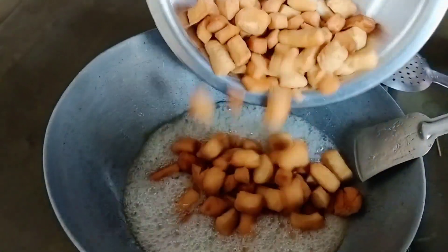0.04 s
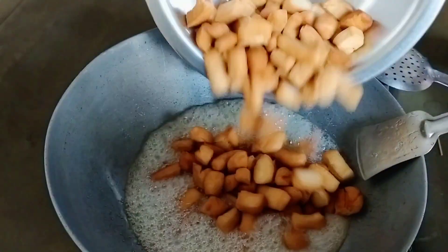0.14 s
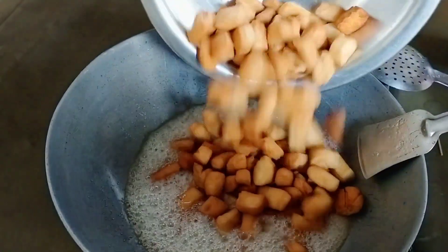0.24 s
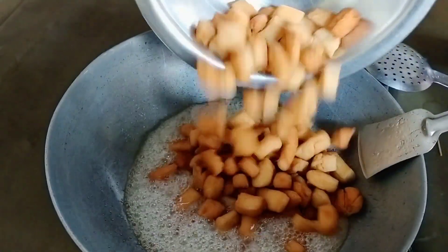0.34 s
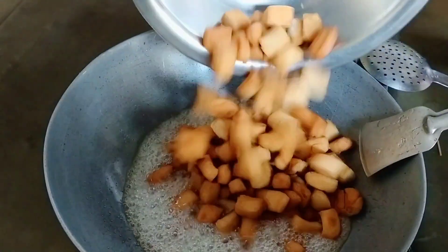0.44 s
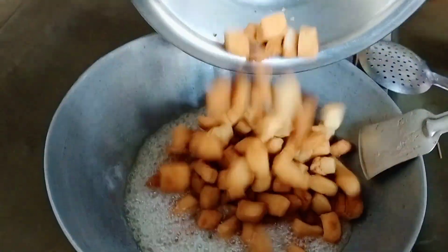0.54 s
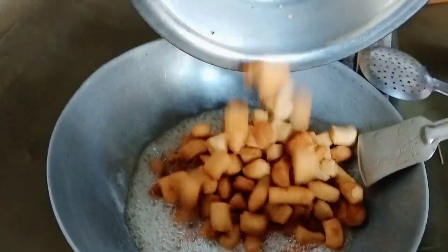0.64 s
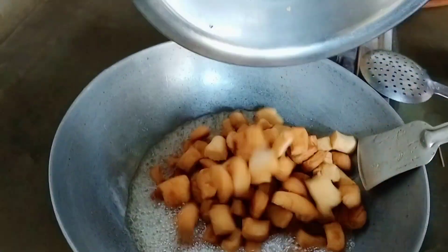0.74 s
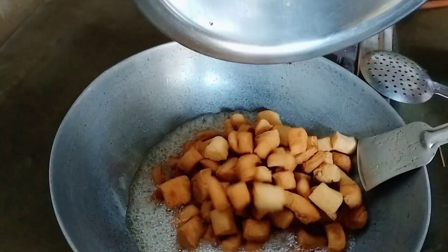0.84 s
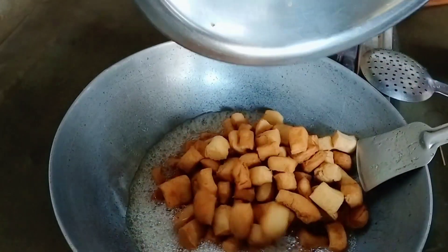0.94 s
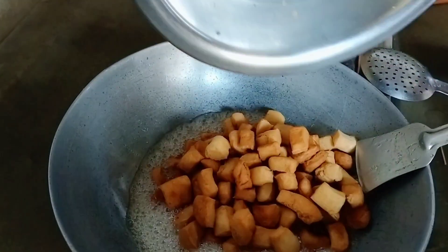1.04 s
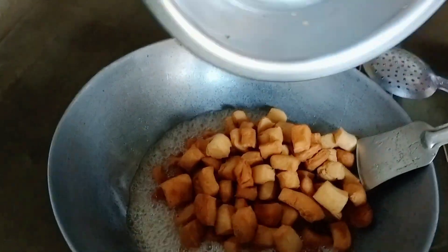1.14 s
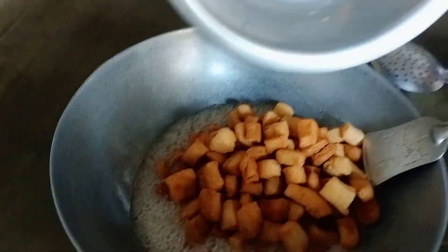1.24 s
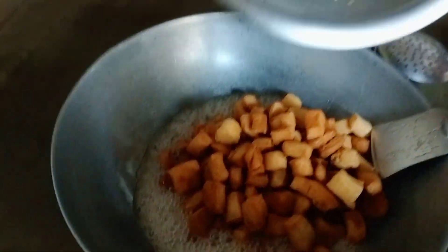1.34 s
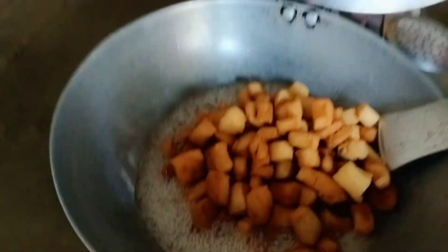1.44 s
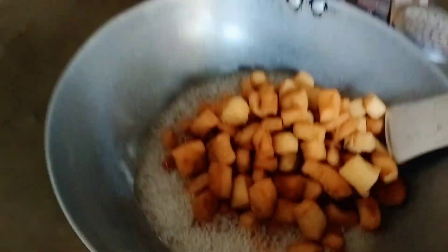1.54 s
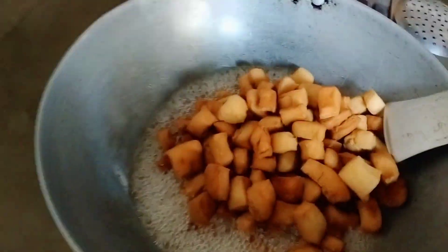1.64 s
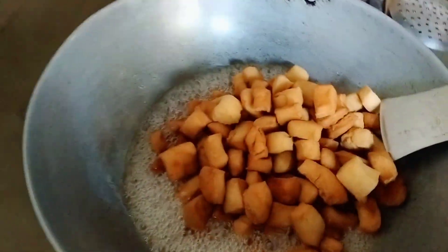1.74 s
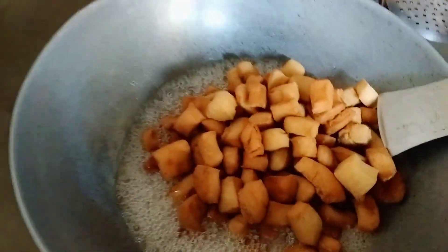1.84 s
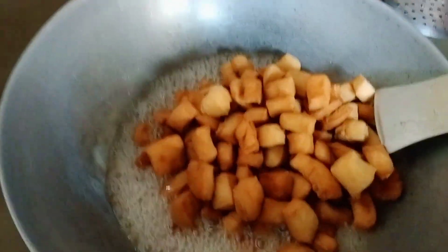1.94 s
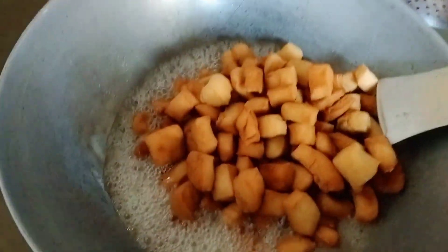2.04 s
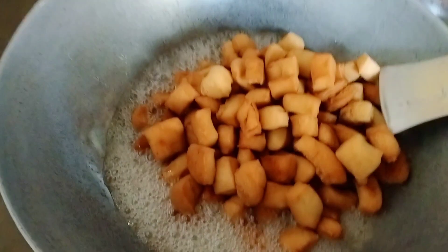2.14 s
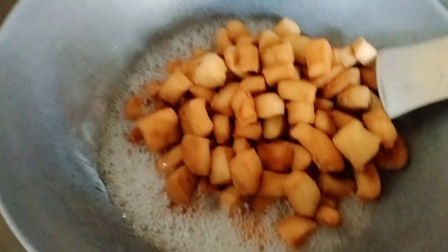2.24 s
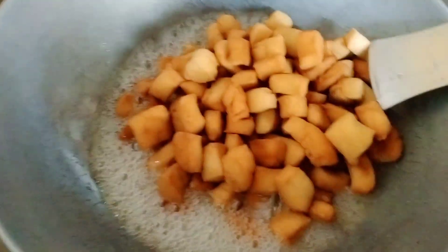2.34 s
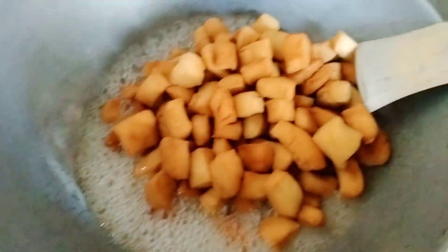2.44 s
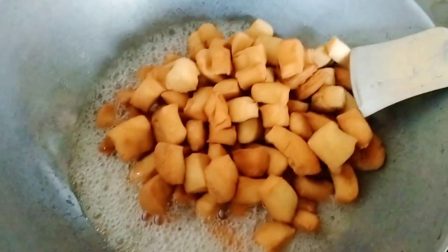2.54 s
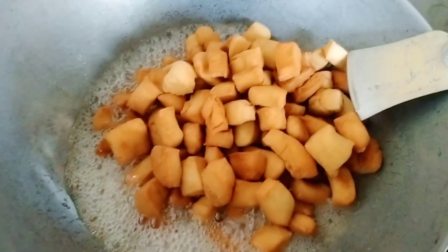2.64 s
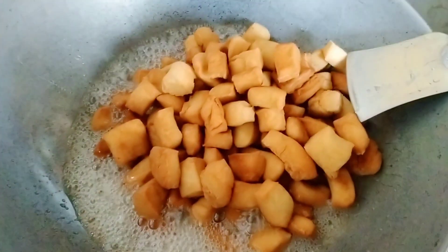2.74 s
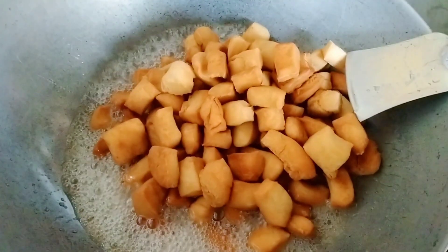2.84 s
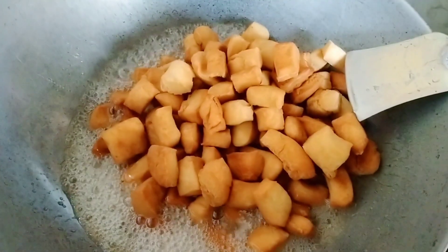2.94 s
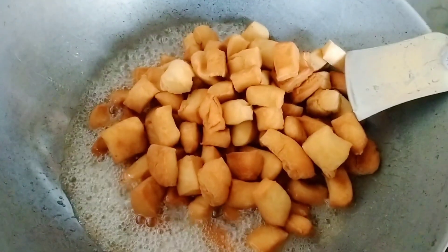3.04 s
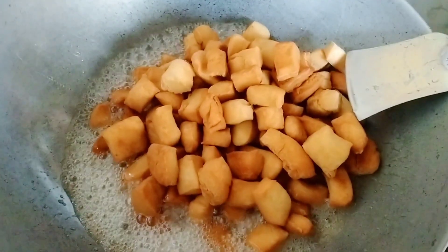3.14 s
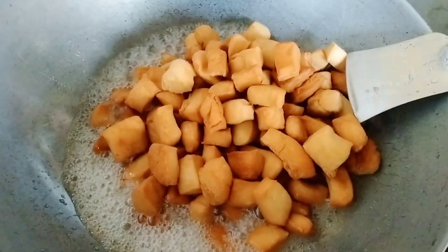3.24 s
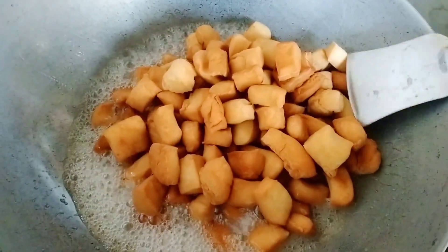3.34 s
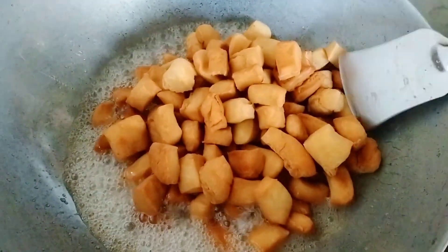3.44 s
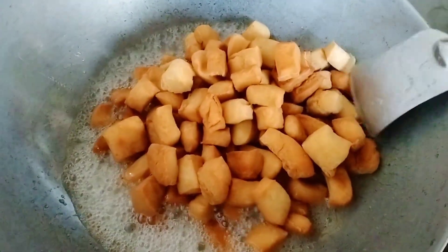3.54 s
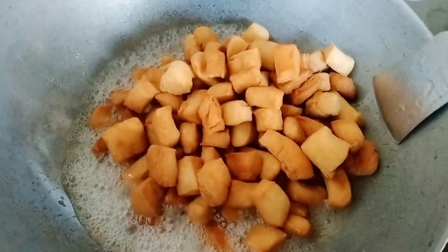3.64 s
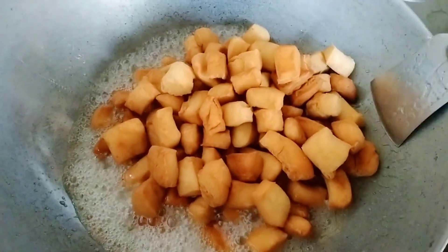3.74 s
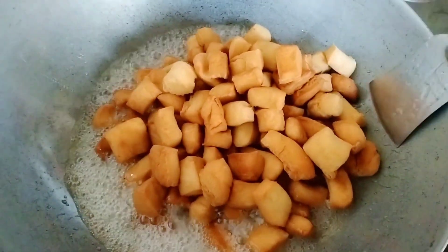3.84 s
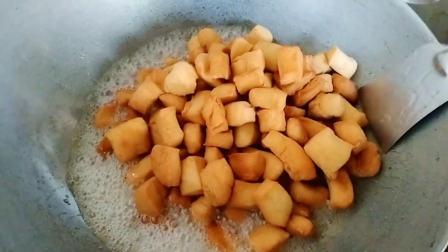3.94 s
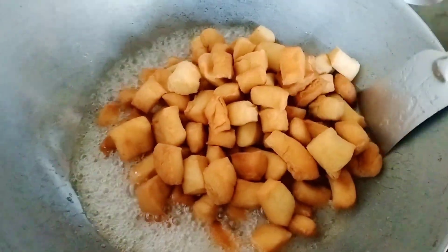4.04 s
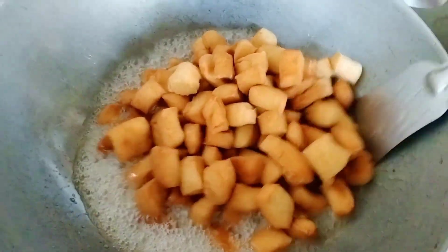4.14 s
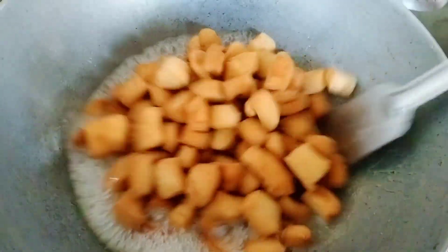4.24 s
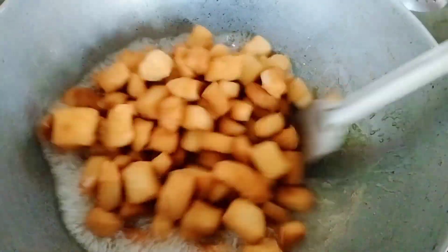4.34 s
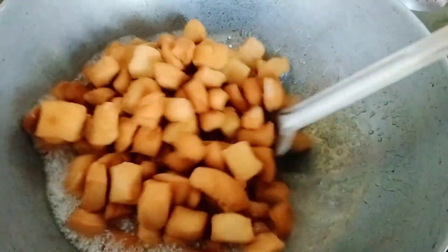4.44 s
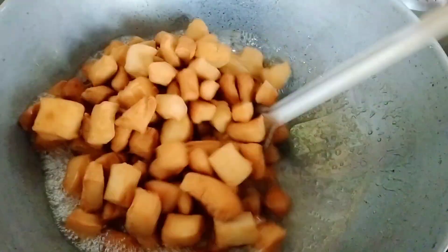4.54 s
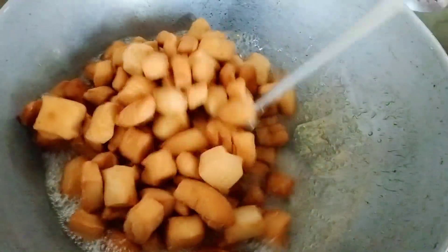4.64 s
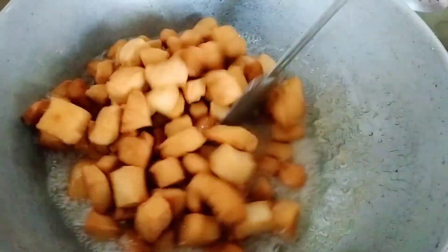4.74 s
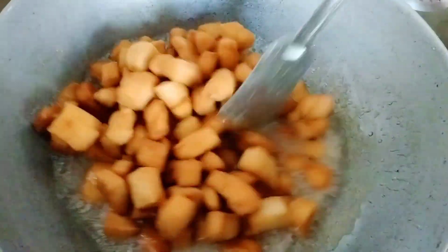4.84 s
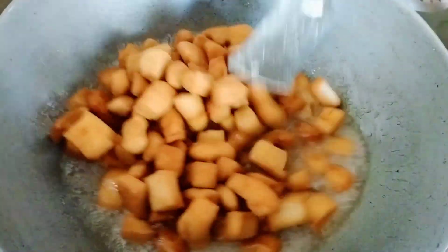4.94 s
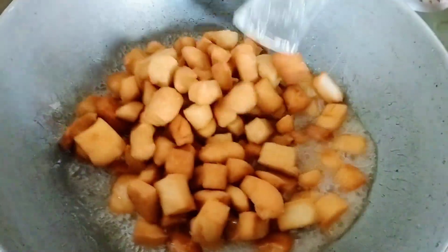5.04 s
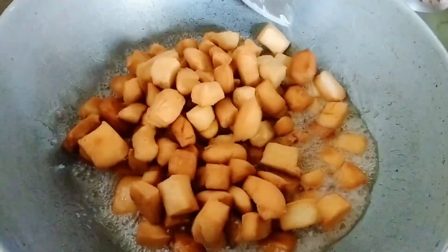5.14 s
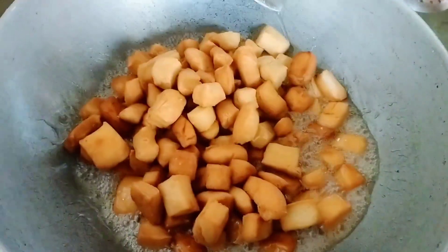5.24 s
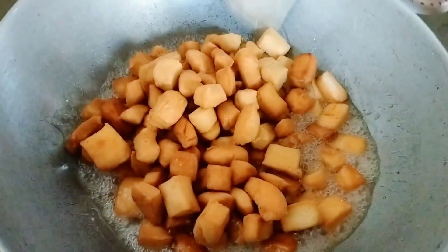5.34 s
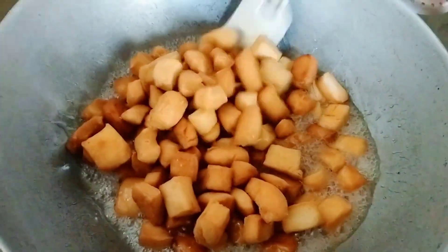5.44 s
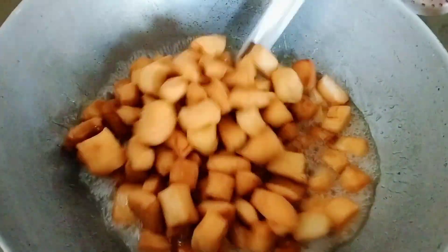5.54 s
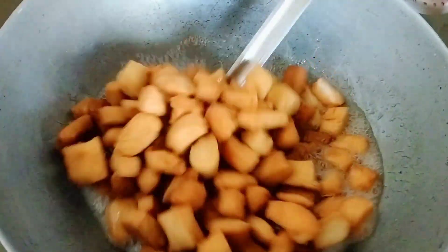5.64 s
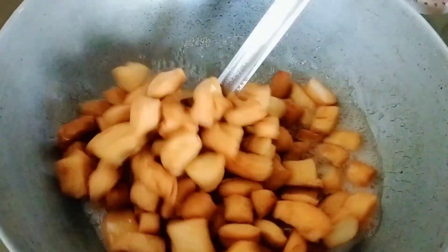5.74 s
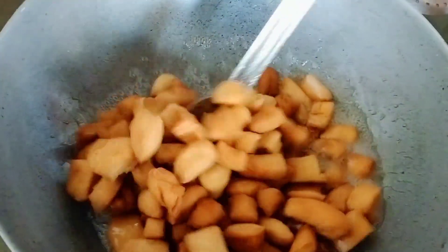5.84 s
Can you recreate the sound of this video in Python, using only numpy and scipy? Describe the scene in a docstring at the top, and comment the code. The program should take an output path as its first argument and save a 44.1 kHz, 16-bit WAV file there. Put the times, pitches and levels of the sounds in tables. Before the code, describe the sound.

Fried dough pieces tumble from a steel bowl into bubbling syrup, the bowl clangs down, then a metal spatula scrapes and turns the heap.

```python
"""In a small kitchen, heard from close above, fried dough pieces tumble from a steel bowl into simmering syrup.
Damped bubble tones and crackling foam make the syrup; short pitched knocks that ring a metal pan make the dough.
Pieces sliding out ring the steel bowl, which is set down with a double clang of decaying modes and a rattle.
A steel spatula then scrapes along the pan and turns the pieces over: dense clicks ring its blade, and it squeals.
A short diffuse tail of noise is the room's answer, over a low steady rush."""
import sys
import numpy as np
from scipy import signal
from scipy.fft import rfft, irfft
from scipy.io import wavfile
from scipy.ndimage import uniform_filter1d, map_coordinates

SR = 44100
rng = np.random.default_rng(int(sys.argv[2]) if len(sys.argv) > 2 else 0)


def unload_audio(sound):
    """Save the sound as a 16-bit wav file, at the path given as the first command line argument."""
    columns = np.transpose(np.atleast_2d(sound))
    # keep every value between -1 and 1, then stretch to whole-number steps
    steps = np.round(np.clip(columns, -1, 1) * 32767)
    wavfile.write(sys.argv[1], SR, steps.astype(np.int16))


N = 259749
TIME = np.arange(N) / SR
SHORT = TIME[:SR // 2]

# resonances of the laden pan, damped by the syrup: (frequency [Hz], level over the direct knock [dB]);
# they also stand in for the modes of the bowl as pieces slide out of it
PAN_MODES = [(435, -5), (580, -4.5), (817, -3.5), (1092, -2.5)]
# tipping the bowl, as bite, attack, hold and release [s]
POUR = (0.0072, 0.96, 0.95, 0.44)


def amp(db):
    """Logarithmic level: 20 dB is a factor of ten in amplitude."""
    return 10 ** (np.asarray(db) / 20)


def unit(x):
    """Normalization by mean power: scale to rms 1."""
    return x / np.sqrt(np.mean(x ** 2))


def curve(rows):
    """Linear interpolation in time of a table of (time [s], value)."""
    return np.interp(TIME, *np.transpose(rows))


def add(out, s, x):
    """Superposition: mix a sound into out from time s."""
    start = int(np.clip(s * SR, 0, N - 1))
    out[start:start + len(x)] += x[:N - start]


def through(x, response):
    """Linear system: convolve a sound with an impulse response."""
    return signal.fftconvolve(x, response)[:len(x)]


def colour(x, points, size=4096):
    """Minimum-phase filter: a folded cepstrum makes a (frequency [Hz], level [dB]) spectrum causal."""
    hz, db = np.transpose(points)
    bins = np.maximum(np.arange(size // 2 + 1) * SR / size, 1)
    log_gain = np.log(amp(np.interp(np.log(bins), np.log(hz), db)))
    cepstrum = irfft(log_gain)
    fold = np.where(np.arange(size // 2), 1, .5)
    spectrum = np.exp(rfft(2 * cepstrum[:size // 2] * fold, size))
    return through(x, irfft(spectrum))


def band(x, hz, q):
    """Single resonance: a two-pole peak of quality factor q."""
    return signal.lfilter(*signal.iirpeak(min(hz, SR / 3), max(q, .5), fs=SR), x)


def lowpass(x, hz, order=2):
    """Butterworth low-pass: roll off the treble."""
    return signal.sosfilt(signal.butter(order, hz, fs=SR, output="sos"), x)


def body(modes, width_hz):
    """Modal sum: impulse response of (frequency [Hz], level [dB]) modes of one width, alternating in sign."""
    response = sum((-1) ** k * amp(db) * np.sin(2 * np.pi * hz * SHORT) for k, (hz, db) in enumerate(modes))
    return np.exp(-np.pi * width_hz * SHORT) * response


def sheet(low_hz, high_hz, width_hz, count):
    """High modal density of thin steel: impulse response of many narrow, unevenly spaced modes."""
    hz = np.geomspace(low_hz, high_hz, count) * (1 + rng.uniform(-1.0, 1, count) / count)
    phases = np.exp(2j * np.pi * rng.random(count))
    lines = np.zeros(len(SHORT), complex)
    np.add.at(lines, np.minimum(hz, SR / 2 - 1).astype(int), np.sqrt(hz) * phases)
    return irfft(lines, SR)[:len(SHORT)] * np.exp(-np.pi * width_hz * SHORT)


def wander(rate):
    """Slow random process: Gaussian knots, rate per second, joined by straight lines; spread near 1."""
    knots = rng.standard_normal(int(rate * N / SR) + 2)
    return np.interp(TIME * rate, np.arange(len(knots)), knots)


def clicks(rate, spread_db):
    """Shot noise: impulses at random times, rate per second, many small and a few large; rms 1."""
    when, chance, sign = rng.random((int(rate * N / SR), 3)).T
    steps = np.minimum(-np.log(1 - chance), np.pi)
    size = amp(spread_db * steps) * np.sign(sign - .5)
    return unit(np.bincount((when * N).astype(int), size, N))


def burst(seconds):
    """Noise under a critically damped envelope: it swells quickly and dies away; rms 1 at its top."""
    return rng.standard_normal(len(SHORT)) * SHORT / seconds * np.exp(1 - SHORT / seconds)


def grains(pitches, rate, spread_db, q):
    """Shot-excited resonators: unrelated clicks ring each pitch [Hz] briefly; flat spectrum on average."""
    rings = [unit(band(band(clicks(rate, spread_db), hz, q), hz, q)) * np.sqrt(hz) for hz in pitches]
    return unit(sum(rings))


def knock(hz, cycles, crack_db, crack_s):
    """Impact: a damped tone of a few cycles with a crack of noise; envelope peak near 1."""
    tone = np.sin(2 * np.pi * hz * SHORT) * np.exp(-SHORT * hz / cycles) * (1 - np.exp(-SHORT * hz))
    crack = band(band(burst(crack_s), 0.9 * hz, 0.48), 0.9 * hz, 0.48) * np.sqrt(SR / hz / 10)
    x = tone + amp(crack_db) * crack
    return x / np.sqrt(2 * uniform_filter1d(x ** 2, size=128).max())


def steady(x, seconds):
    """Gain control by running rms: even out slow swings of a texture, keeping its grain."""
    return x / np.sqrt(uniform_filter1d(x ** 2, int(seconds * SR) + 1) + np.mean(x ** 2) / 100)


def slide(x, share, rate):
    """Variable-rate resampling: all pitches drift together by a small share."""
    return map_coordinates(x, [np.cumsum(1 + share * wander(rate))], order=3, mode="mirror")


def push(bite, attack, hold, release):
    """Envelope linear in decibels: a hand's push builds up to its bite, slackens while held, and lets go."""
    edge_db, slacken_db = 38, 5  # span of attack and of release; loss over the hold
    before = np.maximum(bite - TIME, 0) / attack
    after = np.maximum(TIME - bite - hold, 0) / release
    return amp(-edge_db * (before + after) - slacken_db * np.clip((TIME - bite) / hold, 0, 1))


def rush():
    """Stationary filtered noise: a low rush whose level wavers slightly."""
    # spectrum: (frequency [Hz], level per Hz [dB])
    rush_colour = [(30, -25.5), (129, 5.5), (600, -9.5), (1500, -14), (3300, -60)]
    noise = unit(colour(rng.standard_normal(N), rush_colour))
    return noise * amp(-59.0 + 0.97 * wander(rate=6.6))


def syrup():
    """Bubble resonance: bubbles ring briefly at many pitches, foam crackles and bigger bubbles burst."""
    # spectra of bubbling and of foam: (frequency [Hz], level per Hz [dB])
    simmer_colour = [(150, -9.5), (400, 3), (1400, -2), (3000, -6), (4200, -25), (9000, -25.5)]
    foam_colour = [(1500, -0.5), (4500, -10), (7000, -2), (11000, -3), (15500, 6.5)]
    # the foam's hiss: (time [s], level [dB])
    foam_levels = [(1.2, -58), (2.1, -60.5), (2.3, -76), (2.8, -50), (3.1, -53.5), (4.0, -58.5)]
    # big bubbles bursting: (time [s], level [dB])
    big_pops = [(1.146, -47.5), (1.172, -38.5), (1.532, -45), (1.7646, -40), (1.7787, -48), (1.976, -44.5),
                (3.265, -41), (3.413, -47), (3.608, -46), (3.846, -38), (4.324, -51)]
    simmer_db, boil_up_db, foam_up_db = -56, -41.5, -39.5
    cooled_s, cooled_width_s, cooled_db = 1.76, 0.57, -7.5
    pops_per_s, pop_db, pop_spread_db, pop_hz, pop_spread_octaves = 38, -52.5, 2.5, 2510, 0.444

    bubbles = grains(np.geomspace(400, 5500, 14), rate=130, spread_db=4.0, q=3.05) * amp(4.0 * wander(rate=33))
    bubbling = unit(colour(bubbles + amp(1.5) * rng.standard_normal(N), simmer_colour))
    foam = unit(colour(clicks(rate=3200, spread_db=3.0), foam_colour)) * amp(3.7 * wander(rate=48))
    # the dough briefly cools and calms the steady simmer
    heat = amp(cooled_db * np.exp(-((TIME - cooled_s) / cooled_width_s) ** 2))
    # the syrup boils up while the dough falls in
    pouring = push(*POUR)
    # the froth rises as more dough goes in
    froth = pouring * amp(6.1 * np.minimum(TIME / POUR[2], 1) - 3.0)
    out = bubbling * np.hypot(amp(simmer_db) * heat, amp(boil_up_db) * pouring)
    out += foam * np.hypot(amp(curve(foam_levels)), amp(foam_up_db) * froth)

    pops = [(s, db, pop_hz) for s, db in big_pops]
    # others burst at random times, levels and pitches
    for _ in range(int(pops_per_s * N / SR)):
        s = rng.uniform(0, N / SR)
        db = pop_db + pop_spread_db * rng.standard_normal()
        pops.append((s, db, pop_hz * 2 ** (pop_spread_octaves * rng.standard_normal())))
    for s, db, hz in pops:
        add(out, s, amp(db) * knock(hz, cycles=5.2, crack_db=-10.5, crack_s=0.003))
    return out


def dough():
    """Impact excitation: light pieces knock on each other, each at its pitch, and dully ring the pan."""
    # the loudest single pieces landing or toppling off the spatula: (time [s], level [dB], pitch [Hz])
    landings = [(0.003, -24, 877), (0.051, -21, 440), (0.075, -18, 890), (0.1, -23, 920),
                (0.201, -26.5, 980), (0.222, -19, 1170), (0.279, -34, 1090), (0.338, -32.5, 410),
                (0.396, -23.5, 545), (0.498, -32, 560), (0.53, -26, 915), (0.543, -26.5, 613),
                (0.574, -28, 444), (0.629, -23.5, 735), (0.714, -26, 436), (0.829, -29.5, 436),
                (0.855, -27, 630), (0.913, -30, 520), (0.933, -29.5, 1020), (0.961, -26.5, 910),
                (0.985, -30.5, 988), (1.029, -30, 1820), (1.082, -33.5, 1630), (1.114, -32, 920),
                (1.215, -41, 936), (1.376, -39, 1030), (4.701, -20.5, 1860), (4.727, -24, 542),
                (4.753, -26.5, 585), (4.842, -34.5, 845), (5.124, -34.5, 885), (5.142, -29, 540),
                (5.222, -35, 1370), (5.255, -36, 770), (5.398, -36, 814), (5.773, -29, 646),
                (5.84, -26, 826), (5.87, -29, 576), (5.883, -24, 1420)]
    # the spatula shoves the heap: (bite [s], attack [s], hold [s], release [s], level [dB])
    shoves = [(4.66, 0.55, 0.19, .14, -40), (4.998, 0.23, 0.29, .3, -44.5), (5.762, 0.074, 0.21, .1, -39)]
    # spectra of falling pieces, and of wet ones pushed through syrup: (frequency [Hz], level per Hz [dB])
    falling_colour = [(60, -28), (130, 3), (300, 7), (640, 2.5), (745, -9.5), (900, 3), (1400, -8.5),
                      (3100, -8.5), (4200, -30), (14000, -7)]
    stirred_colour = [(80, -7), (420, 5.5), (850, 3.5), (1500, -4.5), (3100, -13.5), (4200, -11.5),
                      (14000, -42)]
    pour_db, pan_width_hz = -34.5, 18
    knock_on_db, knock_on_s = -12.5, 0.011  # level under the landing; decay time

    crowd = grains(np.geomspace(200, 3000, 10), rate=65, spread_db=4.0, q=2.5)
    crumbs = through(clicks(rate=380, spread_db=0.0), burst(0.0011))
    contacts = crowd + amp(-1.5) * unit(crumbs)
    knocks, unrest = np.zeros(N), np.zeros(N)
    for s, db, hz in landings:
        piece = knock(hz, cycles=2.45, crack_db=-6, crack_s=0.0026)
        add(knocks, s, amp(db) * lowpass(piece, hz=3340, order=6))
        # each landing sets its neighbours jostling for a moment
        add(unrest, s, amp(db + knock_on_db) * np.exp(-SHORT / knock_on_s))
    falling = steady(colour(contacts, falling_colour), seconds=0.034)
    falling = falling * np.hypot(amp(pour_db) * push(*POUR), unrest)
    shoving = sum(amp(db) * push(*timing) for *timing, db in shoves)
    stirred = steady(colour(contacts, stirred_colour), seconds=0.062) * shoving
    # the pieces come in small clumps
    direct = knocks + (falling + stirred) * amp(-2.5 + 1.1 * wander(rate=62))
    pan = sum(amp(db) * band(direct, hz, hz / pan_width_hz) for hz, db in PAN_MODES)
    return amp(-1.0) * (direct + pan)


def sliding():
    """Modal excitation by ticks: pieces slide out against the steel bowl and wake now one mode, now another."""
    ring = np.zeros(N)
    # the bowl's modes are taken as the pan's
    for mode in PAN_MODES:
        ticking = through(clicks(rate=43, spread_db=1), body([mode], width_hz=11.3))
        ring += ticking * amp(4.2 * wander(rate=7.12))
    return amp(-41.0) * steady(ring, seconds=0.15) * push(*POUR)


def grazing():
    """Modal ringing under light friction: touches of the bowl's thin rim wake its high modes."""
    # the rim grazes the pan, a brief high tick sounds near 0.69 s, and later the rim skids on the counter:
    # (bite [s], attack [s], hold [s], release [s], level [dB])
    grazes = [(0.017, 0.0057, 0.01, 0.03, -29), (0.05, 0.05, 0.026, 0.035, -31.5),
              (0.688, 0.0071, 0.004, 0.018, -33.5), (2.557, 0.017, 0.08, 0.04, -48),
              (2.762, 0.028, 0.016, 0.06, -43)]
    # modes of the rim: (frequency [Hz], level [dB])
    rim = [(3490, -3), (4015, -4), (5450, -2.5), (6630, 1.5), (7600, -3.5), (8300, 0.5), (11200, 6.5),
           (14500, 7)]
    touch = sum(amp(db) * push(*timing) for *timing, db in grazes)
    return touch * unit(through(clicks(rate=4000, spread_db=2), body(rim, width_hz=145)))


def bumps():
    """Heavily damped impact: a short tock, a fine tick and a slow bass swing; later a low rub."""
    # dull bumps close by: (time [s], level before a common trim [dB], bass over tock [dB])
    blows = [(2.233, -26.5, -8), (2.264, -22.5, -6), (2.426, -22.5, -4), (2.526, -27.5, -21),
             (2.554, -28, -4)]
    out = np.zeros(N)
    for s, db, bass_db in blows:
        tock = knock(hz=385, cycles=0.6, crack_db=-12.5, crack_s=0.0023)
        bass = np.sin(2 * np.pi * 125 * SHORT) * SHORT / 0.0049 * np.exp(1 - SHORT / 0.0056)
        add(out, s, amp(db - 6.5) * (tock + amp(-21.0) * burst(0.0022) + amp(bass_db) * bass))
    # a low rub as things settle
    rub = unit(band(band(rng.standard_normal(N), 182, q=2.2), 225, q=2.2))
    return out + rub * amp(-50) * push(bite=3.27, attack=0.36, hold=0.25, release=0.36)


def bowl():
    """Modal excitation: the bowl lands on its edge, drops flat and chatters; the contact weighs its modes."""
    # blows on the counter:
    # (time [s], ring level [dB], thud level [dB], chatter level [dB], contact [0 edge to 1 flat])
    blows = [(2.586, -13, -17.5, -28, 0), (2.632, -44, -19, -31.5, 0.98), (2.693, -32, -22.5, -32, 0.47),
             (2.727, -18, -13, -25, 1), (2.747, -31, -23, -26, 0.46), (2.8, -29, -22.5, -50, 1),
             (2.846, -57, -23.5, -46, 0.85)]
    # modes: (frequency [Hz], 60 dB decay time [s], level struck on the edge [dB], level struck flat [dB])
    bowl_modes = [(384, 0.39, -16, -13), (429, 0.29, -11.5, -5.5), (589, 0.14, -22, 7),
                  (712, 0.15, -5.5, -2), (823, 0.22, 3.5, -11), (913, 0.44, -26, -9.5),
                  (1313, 0.26, -10, -12), (1773, 0.18, -15, -2), (1923, 0.22, -9, -24),
                  (2260, 0.23, -5, -2.5), (2760, 0.22, -34, -12), (2790, 0.2, -20, -6),
                  (3000, 0.17, -16, -8.5), (3500, 0.085, -13, -9.5)]
    # spectrum of the rattle: (frequency [Hz], level per Hz [dB])
    clatter_colour = [(70, -21), (280, 8), (1500, -3), (3200, -2), (4200, -21), (6500, -13.5), (14500, -28)]
    chatter_rise_s, chatter_fade_db_per_s = 0.0044, 140

    out, chatter_power = np.zeros(N), np.zeros(N)
    hz, t60, edge_db, flat_db = np.transpose(bowl_modes)[:, :, None]
    decay = np.exp(-np.log(1000) * SHORT / t60)
    dying = (1 - np.exp(-SHORT / chatter_rise_s)) * amp(-chatter_fade_db_per_s * SHORT)
    for s, ring_db, thud_db, chatter_db, flat in blows:
        # phase runs on from blow to blow, so each feeds the swing that is already there
        phase = 2 * np.pi * hz * (SHORT + s)
        mode_db = edge_db + np.clip(flat, 0, 1) * (flat_db - edge_db)
        ring = (amp(mode_db) * decay * np.sin(phase)).sum(axis=0)
        add(out, s, amp(ring_db) * ring * (1 - np.exp(-SHORT / 0.018)))
        add(out, s, amp(thud_db) * knock(390 + 140 * flat, cycles=0.93, crack_db=-13.0, crack_s=0.0031))
        # after each blow the bowl chatters on its base
        add(chatter_power, s, (amp(chatter_db) * dying) ** 2)
    contacts = clicks(rate=2700, spread_db=2.5)
    rattle = unit(through(contacts, sheet(260.5, 15500, width_hz=33, count=240))) + amp(3) * contacts
    return out + steady(colour(rattle, clatter_colour), seconds=0.074) * np.sqrt(chatter_power)


def scraping():
    """Stick-slip friction: steel catches and slips on the pan, and dense clicks ring the blade."""
    # strokes: (bite [s], attack [s], hold [s], release [s], level [dB], tilt [dB per octave], focus [Hz])
    strokes = [(3.970, 0.0037, 0.062, 0.04, -27.5, 6, 6700), (4.249, 0.12, 0.048, 0.04, -51, 5.5, 6300),
               (4.553, 0.19, 0.069, 0.03, -44.5, 7.5, 5400), (4.613, 0.06, 0.13, 0.21, -33, 3, 4700),
               (5.702, 0.11, 0.045, 0.03, -42.5, 4.5, 3630), (5.762, 0.076, 0.13, 0.14, -35.5, 1.3, 3270)]
    # modes of the blade on the pan: (frequency [Hz], level rubbed [dB], level tapped [dB])
    blade_modes = [(313, 2.5, -13.5), (817, 2.5, -3), (1464, 9.5, -20), (1930, 4, 2.5), (2220, 9, -19),
                   (2363, 7.5, -22), (2650, 0, 0.5), (3280, 0.5, -24), (3590, -4.5, -1.5), (4600, -10, -24),
                   (5100, -7, -19), (5550, -8, -22), (6440, -5, -13), (7240, -6, -24), (11900, 3, -30)]
    # spectrum of the grit: (frequency [Hz], level per Hz [dB])
    scrape_colour = [(100, -33), (330, 2.5), (2400, 9), (5000, -3.5), (14000, -4)]
    # the blade's edge catches and jumps free: (time [s], level [dB])
    catches = [(4.609, -36.5), (4.631, -35), (4.653, -39), (5.759, -34), (5.773, -30), (5.818, -31)]
    # the blade taps the pan: (time [s], level [dB])
    taps = [(5.598, -28.5)]
    # the rubbed blade sings:
    # (time [s], swell [s], pitch [Hz], glide [Hz per s], level [dB], waver [share of pitch])
    squeals = [(3.966, 0.03, 306, 1, -44.5, 0.13), (3.967, 0.017, 2293, -5, -35, 0.031),
               (3.989, 0.011, 3420, -2, -26.5, 0.0066), (4.595, 0.036, 4685, 0, -42, 0.0093),
               (5.664, 0.027, 2574, 2000, -41.5, 0.016)]

    slips = clicks(rate=1500, spread_db=2.5)
    # the travelling edge wakes now one mode of the blade, now another
    ringing = np.zeros(N)
    for hz, db, _ in blade_modes:
        ringing += amp(db + 5.5 * wander(rate=24)) * unit(band(slips, hz, hz / 65))
    ringing = unit(ringing)
    out = np.zeros(N)
    for *timing, db, tilt_db, focus_hz in strokes:
        # every stroke touches the pan somewhere else and wakes other fine modes
        fine_modes = sheet(598.0, 15380, width_hz=99, count=150)
        grit = unit(through(slips, fine_modes)) + amp(-8.0) * unit(slips)
        # they slide as the contact travels
        grit = slide(grit, share=.025, rate=18)
        rasp = ringing + amp(-1.0) * unit(colour(grit, scrape_colour))
        tilted = colour(rasp, [(hz, tilt_db * np.log2(hz)) for hz in (900, 12000)])
        # the angle of the blade lifts one broad band of the rasp
        focused = tilted + band(tilted, focus_hz, q=3.4)
        judder_db = 2.5 * wander(rate=150)
        out += amp(db + judder_db) * push(*timing) * steady(focused, seconds=0.012)

    tapped = body([(hz, db) for hz, _, db in blade_modes], width_hz=56)
    rubbed = body([(hz, db) for hz, db, _ in blade_modes], width_hz=82)
    for s, db in catches:
        add(out, s, amp(db) * through(burst(0.0029), rubbed / np.linalg.norm(rubbed)))
    for s, db in taps:
        tick = burst(0.0027)
        ring = through(tick, tapped)
        add(out, s, amp(db) * (ring / np.abs(ring).max() + amp(-10.5) * tick))
    # where the slips lock to one mode, the steel sings and rings out
    for s, swell, hz, glide, db, waver in squeals:
        age = np.maximum(TIME - s, 0)
        pitch = hz * (1 + waver * wander(rate=330)) + glide * age
        tone = np.sin(2 * np.pi * np.cumsum(pitch) / SR)
        out += amp(db) * age / swell * np.exp(1 - age / swell) * tone
    return out


def kitchen(x, t60=0.17, wet_db=-12):
    """Diffuse reverberation: close walls answer with a short decaying tail of noise."""
    tail = lowpass(rng.standard_normal(len(SHORT)) * np.exp(-np.log(1000) * SHORT / t60), hz=8100)
    return x + amp(wet_db) * through(x, tail / np.linalg.norm(tail))


def scene():
    """Superposition of all sources: the bumps and the rush stay dry, the rest excites the room."""
    in_room = syrup() + dough() + sliding() + grazing() + bowl() + scraping()
    return (kitchen(in_room) + bumps() + rush())[None]


def record(dry):
    """Time-varying filtering: a moving microphone has a sliding treble dip, no deep bass and a cut top."""
    # the treble edge slides as the microphone tilts over the pan: (time [s], frequency [Hz])
    shade_edge = [(1.5, 7860), (2.3, 5650), (4, 6360), (4.7, 5600), (5.3, 5040)]
    # response around that edge: (multiple of its frequency [ratio], level [dB])
    shade_shape = [(.75, 0.5), (1, 1), (1.2, -7.5), (1.5, -15), (1.95, -11)]
    hz, s, frames = signal.stft(dry[0], SR, nperseg=128)
    ratio = hz[:, None] / np.interp(s, *np.transpose(shade_edge))
    gain = amp(np.interp(ratio, *np.transpose(shade_shape)))
    shaded = signal.istft(frames * gain, SR)[1][None, :N]
    shaded = signal.sosfilt(signal.butter(4, 72, "high", fs=SR, output="sos"), shaded)
    return signal.sosfilt(signal.ellip(10, .2, 70, 15600, fs=SR, output="sos"), shaded)


dry = scene()
out = record(dry)
unload_audio(out)
```